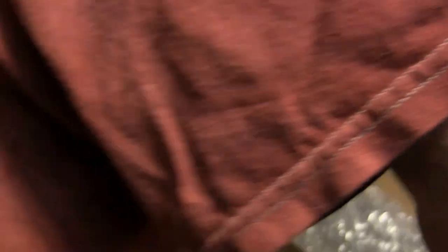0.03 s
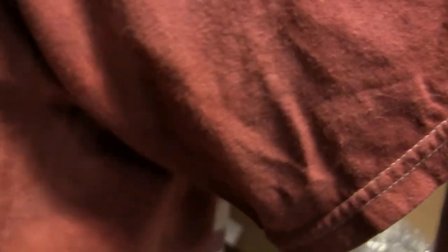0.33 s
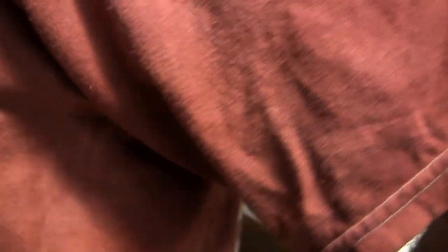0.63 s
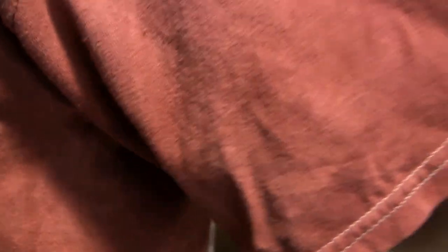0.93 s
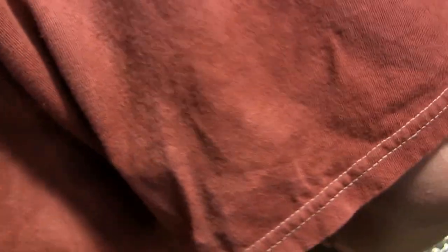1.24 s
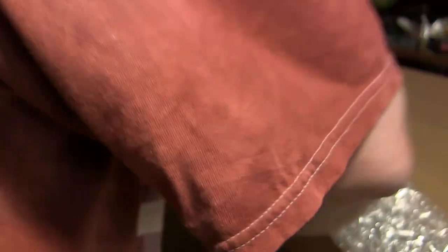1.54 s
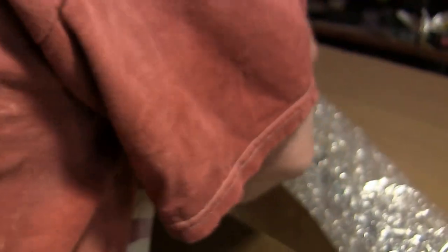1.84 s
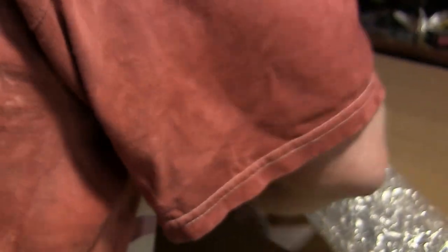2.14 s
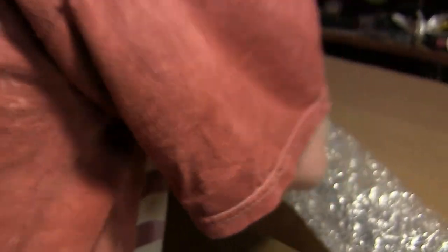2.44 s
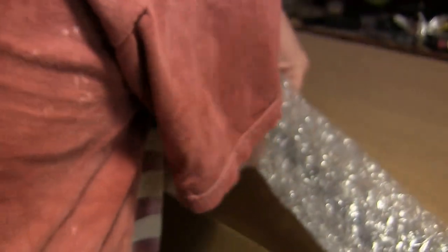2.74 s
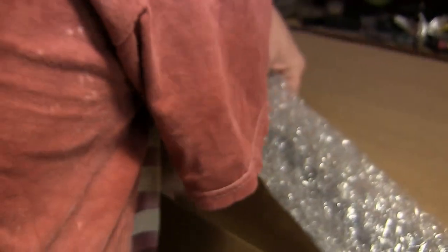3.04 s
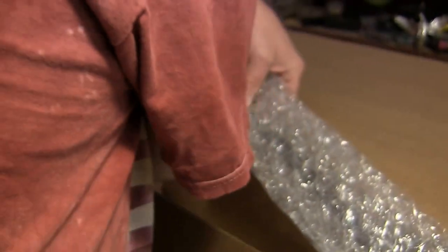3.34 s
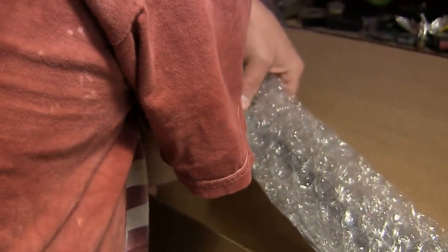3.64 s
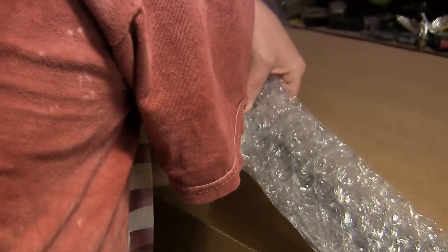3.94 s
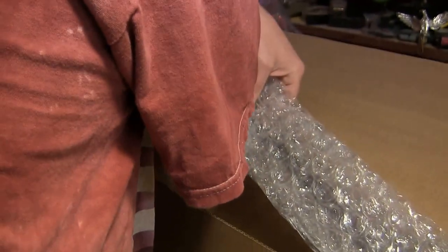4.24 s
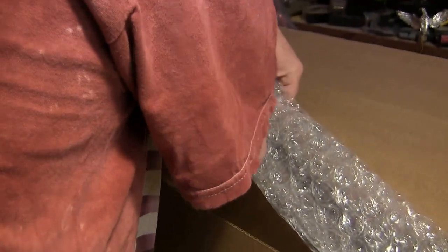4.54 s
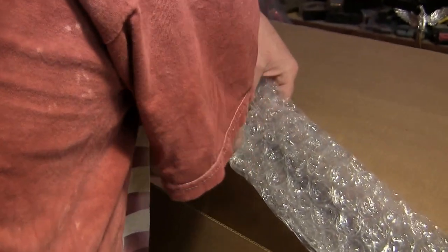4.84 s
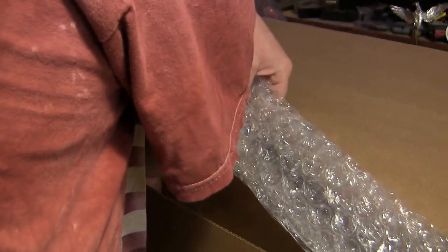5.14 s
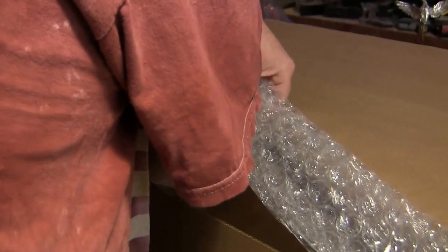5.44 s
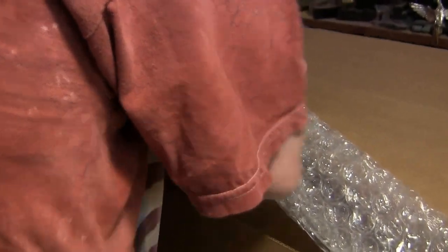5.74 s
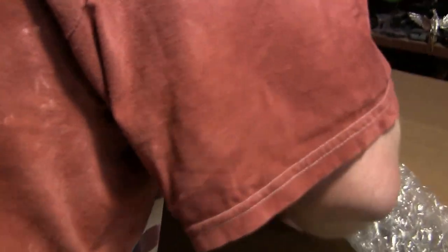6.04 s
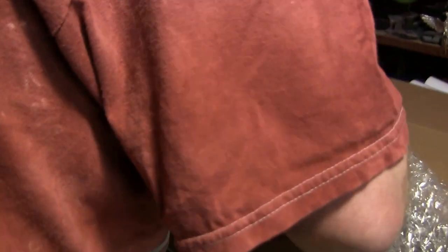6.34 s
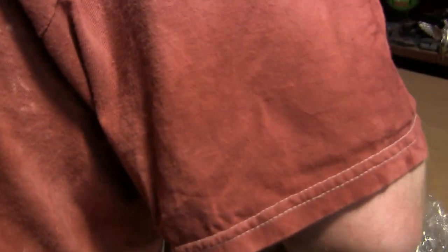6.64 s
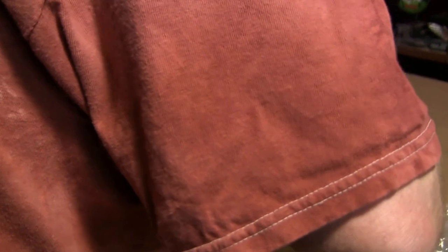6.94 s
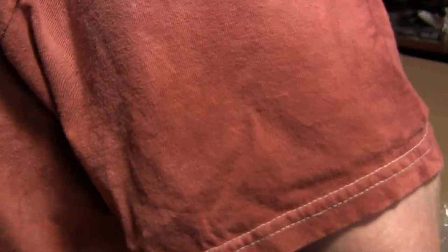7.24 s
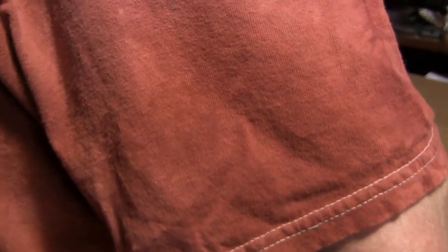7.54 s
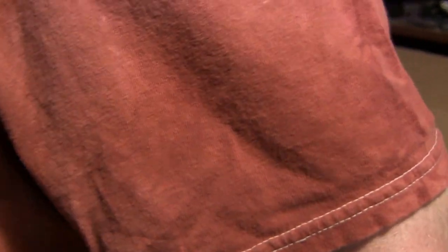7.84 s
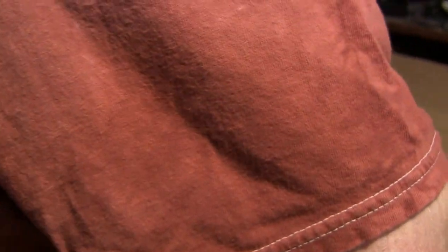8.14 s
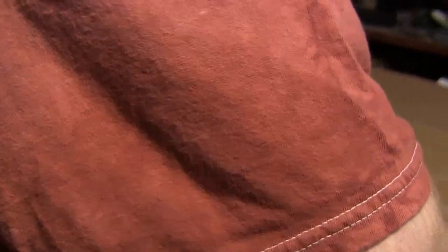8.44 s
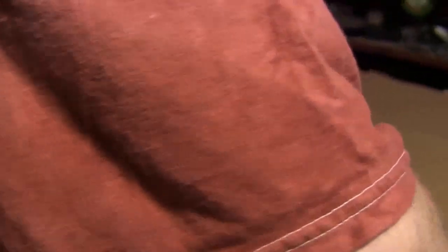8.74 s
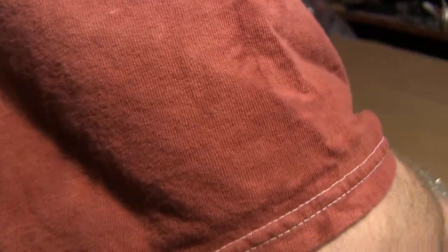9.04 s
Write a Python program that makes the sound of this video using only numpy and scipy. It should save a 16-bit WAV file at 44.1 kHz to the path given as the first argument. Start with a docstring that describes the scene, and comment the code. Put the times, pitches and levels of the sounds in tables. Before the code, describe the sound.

Plastic bubble wrap crackles and scrapes against a cardboard box, which gives several short, hollow knocks. The handling then eases into scattered crinkles, small ticks and brief hoarse squeaks. Past the middle the rustling picks up again, the box is bumped, and the wrap ends in a dense, fizzing crackle with sharp snaps. Everything is heard up close in a small, quiet room.

```python
"""In a small, quiet room a roll of bubble wrap is worked out of a cardboard box, close to the microphone.
The film crinkles in countless tiny buckles and snaps sharply where single folds flip over. Friction
makes it fizz, and makes it rasp, rush and squeak as it drags along the cardboard. Hands and roll knock
against the box, and all of this handling drives the panels and the enclosed air, which ring briefly."""
import sys
import numpy as np
from scipy import signal
from scipy.fft import rfft, irfft, next_fast_len
from scipy.io import wavfile
from scipy.ndimage import uniform_filter1d, map_coordinates

SR = 44100
rng = np.random.default_rng(int(sys.argv[2]) if len(sys.argv) > 2 else 0)


def store_wav(level_fs):
    """Save 16-bit WAV to argv[1]."""
    pcm = np.round(np.clip(np.atleast_2d(level_fs), -1, 1) * 32767)
    wavfile.write(sys.argv[1], SR, pcm.T.astype(np.int16))


N = 401310

# film fizz and bubble crinkle as heard through the microphone, with its dip at 3.7 kHz: f/Hz, level/dB
HEARD_FIZZ = [(1500, -63), (3000, -0.5), (3700, -10.5), (4700, 2), (6800, -1.5), (9000, -9.5),
              (11500, -10.5), (14000, -17), (16000, -25)]
HEARD_CRINKLE = [(30, -62), (120, -31), (300, -22.5), (550, -3.5), (1200, 2), (1700, -0.5), (2300, 0.5),
                 (3000, -5.5), (3700, -12.5), (6000, -23), (12000, -40)]
# stirring of the wrap, which never quite rests between strokes: t/s, level/dB
STIRRING = [(0, -35.5), (0.85, -32.5), (1.15, -39), (1.5, -47.5), (1.73, -53), (2.05, -49), (2.45, -50),
            (2.7, -46.5), (3.6, -52), (3.87, -43), (4.5, -50.5), (5.8, -49), (6.0, -38), (6.7, -40),
            (7.0, -40), (7.85, -37), (8.15, -29.5), (8.45, -32.5), (9.09, -35.5)]


def amp(db):
    """Amplitude ratio of a level in decibels."""
    return 10 ** (np.asarray(db) / 20)


def unit(x):
    """Normalisation to rms 1."""
    return x / np.sqrt(np.mean(x ** 2) + 1e-20)


def along(points, hz):
    """Interpolation of (f/Hz, value) points on a logarithmic frequency axis."""
    f, values = np.transpose(points)
    return np.interp(np.log(hz + 1), np.log(f), values)


def level_curve(points):
    """Gain per sample by linear interpolation of (t/s, level/dB) points."""
    return amp(np.interp(np.arange(N) / SR, *np.transpose(points)))


def add(track, s, sound):
    """Superposition of a sound on the track, starting at s seconds."""
    part = track[max(round(s * SR), 0):][:len(sound)]
    part += sound[:len(part)]


def wobble(rate):
    """Smooth random modulation: a spline through rate knots a second."""
    knots = rng.standard_normal(int(N * rate / SR) + 4)
    return map_coordinates(knots, [np.arange(N) * rate / SR])


def filtered(x, response):
    """Linear filtering: the spectrum of x times a complex frequency response."""
    size = next_fast_len(N + SR // 2)
    return irfft(rfft(x, size) * response(np.fft.rfftfreq(size, 1 / SR)), size)[..., :N]


def coloured(x, spectrum, size=4096):
    """Minimum-phase filtering: the response is causal, so clicks keep their sharp fronts."""
    cepstrum = irfft(np.log(amp(along(spectrum, np.fft.rfftfreq(size, 1 / SR)))))
    cepstrum[1:size // 2] *= 2
    cepstrum[size // 2 + 1:] = 0
    return signal.fftconvolve(x, irfft(np.exp(rfft(cepstrum))))[:N]


def noise(spectrum):
    """Stationary Gaussian noise of rms 1 with the given spectral shape."""
    return unit(coloured(rng.standard_normal(N), spectrum))


def resonate(x, modes, bend):
    """Forced response of damped modes (f/Hz, bandwidth/Hz, level/dB); bend scales their frequencies."""
    warped_time, out = np.cumsum(bend) / SR, 0
    for hz, width, db in modes:
        carrier = np.exp(2j * np.pi * hz * warped_time)
        pole = np.exp(-np.pi * width / SR)
        envelope = signal.lfilter([1 - pole], [1, -pole], x * carrier.conj())
        out = out + 2 * amp(db) * (envelope * carrier).real
    return out


def swing(t, hz, cycles):
    """Heavily damped oscillation of peak 1 whose envelope is greatest after the given cycles."""
    turns = t * hz
    wave = np.sin(2 * np.pi * turns) * turns * np.exp(-turns / cycles)
    return wave / np.abs(wave).max()


def bursts(rate, spread_db, life_s, bed):
    """Shot-noise envelope of rms 1: random jumps of energy decay exponentially over a steady bed."""
    sizes = amp(spread_db * np.minimum(rng.standard_normal(N), 2.1))
    jumps = (rng.random(N) < rate / SR) * sizes ** 2 / rate
    energy = signal.lfilter([1], [1, -np.exp(-1 / (life_s * SR))], jumps)
    return unit(np.sqrt(energy / energy.mean() + bed))


def grains(rate, spread_db, life_s, bed):
    """Amplitude-modulated white noise: tiny bursts over smooth friction."""
    return bursts(rate, spread_db, life_s, bed) * rng.standard_normal(N)


def strokes(rows, swell_db=12, release_db_per_s=293):
    """Incoherent addition: strokes swell up to time t, hold and fade; one gain per level column."""
    t, power = np.arange(N) / SR, 0
    for s, attack, hold, *levels_db in rows:
        rise_db = swell_db * np.minimum(t - s, 0) / attack
        fall_db = release_db_per_s * np.maximum(t - s - hold, 0)
        shape = amp(np.maximum(rise_db - fall_db, -100))
        power = power + np.outer(amp(levels_db), shape) ** 2
    return np.sqrt(power)


def room_hush():
    """Ambient noise: the steady floor of the quiet room, strongest in the bass."""
    spectrum = [(25, -13), (160, -5), (16000, -32)]  # room noise: f/Hz, level/dB
    return amp(-59) * noise(spectrum)


def grip_rumble():
    """Structure-borne noise: a faint rumble as the microphone shifts in the hand."""
    shifts = [(5.08, 0.15, 0.87, -61.5)]  # movement of the grip: t/s, attack/s, hold/s, level/dB
    spectrum = [(25, -17), (75, 7), (600, -69)]  # handling noise: f/Hz, level/dB
    return strokes(shifts)[0] * noise(spectrum)


def room_tail():
    """Reverberation: a random impulse response of energy 1, whose treble is absorbed first."""
    decay_times = [(150, 0.32), (700, 0.31), (3000, 0.18), (14000, 0.031)]  # reverberation time: f/Hz, T60/s
    hz, t, spectra = signal.stft(rng.standard_normal(SR // 3), SR, nperseg=256)
    decay = amp(-60 * t / along(decay_times, hz)[:, None])
    tail = signal.istft(spectra * decay, SR, nperseg=256)[1]
    tail *= 1 - np.exp(-np.arange(len(tail)) / SR / 0.002)
    return tail / np.linalg.norm(tail)


def with_reflections(hit, wall_db, scatter_db, scatter_life_s, room_db):
    """Multipath propagation: direct sound, far box wall echo, nearby scatter and room tail."""
    tail = room_tail()
    t = np.arange(len(tail)) / SR
    scatter = rng.standard_normal(len(t)) * np.exp(-t / scatter_life_s) * (1 - np.exp(-t / 0.0012))
    path = amp(scatter_db) * scatter / np.linalg.norm(scatter) + amp(room_db) * tail
    add(path, 0, [1])
    add(path, 0.0057, [amp(wall_db)])
    return signal.fftconvolve(hit, path)


def box_ring(drive):
    """Modal resonance of the box, a little sharp or flat as the hands load its panels."""
    modes = [(168, 24, -3.5), (368, 48, 0), (520, 56, -0.5), (620, 30, -5), (785, 40, 0.5), (1141, 45, 3.5),
             (1590, 70, -3.5)]  # panels and enclosed air: f/Hz, bandwidth/Hz, level/dB
    return resonate(drive, modes, bend=1 + 0.042 * wobble(3.4))


def box_grumble():
    """Flexure: the bending panels radiate a low, grainy noise."""
    spectrum = [(30, -35), (100, -57.5), (150, 2), (250, -2.5), (400, 0), (650, -0.5), (1500, -32.5)]  # flexing cardboard: f/Hz, level/dB
    return unit(coloured(grains(rate=160, spread_db=6, life_s=0.0028, bed=0.56), spectrum))


def wall_rush():
    """Sliding friction: the box wall rushes as the roll passes along it."""
    slides = [(8.06, .1, 0.51, -41.5), (8.285, 0.04, 0.072, -31), (8.62, 0.18, 0.061, -35),
              (8.8, 0.077, 0.11, -41)]  # roll on the wall: t/s, attack/s, hold/s, level/dB
    spectrum = [(120, -38), (220, -11.5), (330, -5), (500, 1.5), (750, -17), (1500, -27)]  # rubbed wall: f/Hz, level/dB
    return strokes(slides)[0] * noise(spectrum)


def slips(rate, jitter, spread_db):
    """Stick-slip motion: an impulse each time the roll lets go, at an uneven rate."""
    count = np.floor(np.cumsum(rate * np.exp(jitter * wobble(40))) / SR)
    return unit(np.diff(count, prepend=0) * amp(spread_db * rng.standard_normal(N)))


def edge_rasp():
    """Stick-slip excitation: the dragging roll drives the resonances of a cardboard edge."""
    drags = [(.49, 0.012, 0.019, -29), (.66, 0.16, 0.093, -27.5)]  # roll over the edge: t/s, attack/s, hold/s, level/dB
    modes = [(600, 145, 4), (1440, 115, 1.9)]  # edge resonances: f/Hz, bandwidth/Hz, level/dB (each per pass)
    pushes = slips(rate=64, jitter=0.25, spread_db=2) + 0.35 * rng.standard_normal(N)
    bend = 1 + 0.015 * wobble(9)  # pitch wavers with the pressure of the roll
    rasp = resonate(resonate(pushes, modes, bend), modes, bend)  # two passes soften each onset
    return strokes(drags)[0] * unit(rasp)


def squeaks(width_hz=180):
    """Friction-driven resonance: film squeaks hoarsely on cardboard, rising in pitch if it tightens."""
    rubs = [(0.79, 0.2, -39, 1510, 430), (1.855, 0.064, -32.5, 1540, 80), (2.638, 0.072, -34.5, 1150, 0),
            (3.419, 0.037, -31, 610, 0), (3.599, .2, -40.5, 556, 0)]  # film on cardboard: t/s, duration/s, level/dB, f/Hz, rise/Hz
    out = 0
    for s, length, db, hz, rise_hz in rubs:
        progress = np.clip((np.arange(N) / SR - s) / length, 0, 1)
        bend = 1 + progress * rise_hz / hz
        mode = [(hz, width_hz, 0)]
        tone = unit(resonate(resonate(rng.standard_normal(N), mode, bend), mode, bend))
        arch = 2 * np.sqrt(progress * (1 - progress))
        out = out + amp(db) * arch * tone
    return out


def crack(t, spectrum):
    """Broadband transient: a coloured noise burst that decays within milliseconds."""
    return coloured(rng.standard_normal(len(t)) * np.exp(-t / 0.0016), spectrum)[:len(t)]


def knocks():
    """Impact excitation: each blow dents the cardboard; hard contacts are higher and crack more."""
    blows = [(0.1236, -23, 292, 0.41), (0.9276, -3, 530, 0.31), (0.9976, -3, 870, 0.59),
             (1.077, -7.5, 860, 0.65), (1.122, -16.5, 920, 0.41), (1.248, -22, 820, 0.57),
             (1.8467, -19, 212, 0.53), (1.855, -25, 360, 0.41), (2.1185, -26, 420, 0.86),
             (2.297, -23, 210, 0.35), (2.437, -30.5, 280, 0.3), (2.561, -25, 517, 0.39),
             (2.575, -21.5, 390, 0.24), (2.9333, -19.5, 1120, 0.68), (3.2486, -14.5, 1480, 0.66),
             (3.4746, -21, 660, 0.98), (3.9609, -25.5, 1140, 0.4), (4.0927, -19, 670, 0.5),
             (4.6267, -18, 1050, 0.53), (4.691, -21, 1170, 0.25), (4.781, -22.5, 1570, 0.94),
             (5.325, -17.5, 846, 0.4), (5.472, -24.5, 1220, 0.78), (5.8363, -20.5, 279, 0.86),
             (6.2991, -10, 296, 0.4), (6.3047, -14.5, 186, 0.46), (6.382, -20, 1390, 0.51),
             (6.5095, -18, 1220, 0.77), (6.511, -16.5, 516, 0.31), (6.5528, -5, 575, 0.28),
             (6.5567, -1.5, 1130, 0.48), (6.5582, -11, 467, 0.45), (6.566, -9, 1050, 0.55),
             (6.9544, -10, 1430, 0.42), (7.632, -22.5, 333, 0.34), (7.7624, -11.5, 1000, 0.54),
             (8.8709, -16.5, 436, 0.36)]  # hands and roll on the box: t/s, level/dB, f/Hz, ring/cycles
    track, t = np.zeros(N), np.arange(SR // 12) / SR
    for s, db, hz, cycles in blows:
        dent = swing(t, hz, cycles) - amp(-9) * swing(t, hz * 2.12, cycles=0.64)
        hardness = amp(-11) * min(hz / 900, 1) ** 2
        hit = dent + hardness * crack(t, HEARD_CRINKLE)
        heard = with_reflections(hit, wall_db=-12, scatter_db=-13, scatter_life_s=0.008, room_db=-14)
        add(track, s - 0.0003, amp(db) * heard)
    return track


def stray_folds(count=100, above_stirring_db=15.5, spread_db=1.5, centre_hz=3900, spread_octaves=0.8):
    """Random buckling of lesser folds, as loud as the wrap is restless: rows of t/s, level/dB, f/Hz."""
    s = rng.random(count) * N / SR
    size, pitch = np.clip(rng.standard_normal((count, 2)), -2, 2).T
    db = np.interp(s, *np.transpose(STIRRING)) + above_stirring_db + spread_db * size
    return list(zip(s, db, centre_hz * 2 ** (spread_octaves * pitch)))


def snaps():
    """Snap-through: a fold flips and swings; small, high folds have a sharper front and more fizz."""
    folds = [(0.209, -4, 3120), (0.217, -6, 2530), (0.304, -10.5, 8950), (0.3263, -3, 9400),
             (0.3895, -15.5, 7200), (0.535, -16.5, 5000), (0.7466, -8, 4830), (2.5456, -14, 4870),
             (2.8443, -21, 6020), (3.2488, -22, 5000), (3.9744, -23.5, 1800), (4.005, -24.5, 5500),
             (4.0482, -19.5, 1460), (4.275, -25.5, 1500), (4.3364, -22, 2480), (4.558, -19.5, 6350),
             (4.7452, -21, 1480), (5.007, -22, 1680), (5.9194, -9, 1310), (6.4469, -12.5, 1360),
             (6.9636, -8, 3620), (7.2108, -13.5, 1280), (7.3, -19.5, 1550), (7.369, -3, 5230),
             (7.762, -10, 3030), (7.9337, -15.5, 2470), (8.073, -9.5, 1230), (8.2627, -4, 5000),
             (8.2937, -3.5, 2430), (8.3263, -8.5, 2780), (8.3606, -4, 2000), (8.366, -7, 2060),
             (8.4669, -6.5, 2260), (8.8699, -5.5, 2340)]  # single folds flipping over: t/s, level/dB, f/Hz
    track, t = np.zeros(N), np.arange(SR // 50) / SR
    front = swing(t, hz=6650, cycles=0.46)
    for s, db, hz in folds + stray_folds():
        sharpness = amp(-6) * min(hz / 3000, 1)
        hit = swing(t, hz, cycles=0.33) + sharpness * (front + crack(t, HEARD_FIZZ))
        heard = with_reflections(hit, wall_db=-19, scatter_db=-12.5, scatter_life_s=0.012, room_db=-12.5)
        add(track, s - 0.0001, amp(db) * heard)
    return track


def scuffs(hiss):
    """Brief friction of taut film on itself: the hiss flares in Gaussian pulses."""
    contacts = [(1.912, 0.0095, -40), (2.232, 0.032, -40), (2.843, .006, -43), (2.98, 0.017, -53),
                (3.186, 0.0048, -44), (3.79, 0.0067, -38), (4.139, 0.0048, -39), (4.351, .007, -48),
                (4.561, 0.012, -41), (5.661, 0.019, -38.5)]  # film on film: t/s, half-length/s, level/dB
    t = np.arange(N) / SR
    gain = sum(amp(db) * np.exp(-np.minimum(((t - s) / half) ** 2, 20)) for s, half, db in contacts)
    return gain * unit(hiss)


def dappled(x, patchy_db):
    """Local resonance: each crackle comes from another patch of film and has its own colour."""
    spectra = signal.stft(x, nperseg=512)[2]
    field = uniform_filter1d(rng.standard_normal(spectra.shape), size=3, axis=0)  # across frequency
    field = uniform_filter1d(field, size=4, axis=1)  # across time
    return signal.istft(spectra * amp(patchy_db * unit(field)), nperseg=512)[1][:N]


def film(fizz_gain, crinkle_gain, usual_crinkle_db=-41, glide_db=-29):
    """Friction and buckling: film fizzes, bubbles crinkle; brisker handling makes the crackle denser."""
    sheen = [(0, 4.5), (.75, 11), (2.2, 7), (2.7, 7.5), (4.4, 7), (5.25, 10), (6.0, 6.5), (7.2, 2.5),
             (8.3, 3.5), (9.1, 2)]  # lift of the fizz above 9 kHz: t/s, level/dB
    pace = (crinkle_gain / amp(usual_crinkle_db)) ** 0.4
    catch = bursts(rate=72, spread_db=1, life_s=0.01, bed=1.6)  # one buckle sets off its neighbours
    catch = catch ** (1 / np.hypot(1, fizz_gain / amp(glide_db)))  # gliding film catches less
    friction = coloured(grains(rate=900 * pace, spread_db=15, life_s=0.00099, bed=1), HEARD_FIZZ)
    treble = filtered(friction, lambda hz: 1 - 1 / (1 + (hz / 9000) ** 6))
    fizz = unit(friction + (level_curve(sheen) - 1) * treble)
    buckles = coloured(grains(rate=600 * pace, spread_db=0, life_s=0.0016, bed=0.22), HEARD_CRINKLE)
    crinkle = unit(dappled(buckles, patchy_db=2.5))
    return catch * (fizz_gain * fizz + crinkle_gain * crinkle) + scuffs(friction + amp(24.5) * treble)


def handling():
    """Power sum of strokes and stirring: the gains of fizz, crinkle and box flexing."""
    # pulls and squeezes of the roll: t/s, attack/s, hold/s, fizz/dB, crinkle/dB, flexing/dB
    pulls = [(0.02, 0.13, 0.23, -30.5, -33.5, -37), (0.45, 0.0042, 0.017, -38, -31, -35.5),
             (0.73, 0.06, 0.061, -31.5, -30.5, -42), (1.33, 0.029, 0.17, -50, -49, -51.5),
             (1.61, 0.006, 0.0055, -45, -41.5, -71), (1.875, 0.031, 0.04, -35.5, -30.5, -32),
             (2.07, 0.18, 0.23, -38, -38.5, -47), (2.57, 0.059, 0.075, -44, -41.5, -38.5),
             (2.65, 0.022, 0.049, -43.5, -36, -39), (2.732, 0.02, 0.0042, -34.5, -30.5, -34.5),
             (2.85, 0.064, 0.02, -49, -38.5, -41.5), (2.94, 0.019, 0.028, -45.5, -35.5, -35),
             (3.14, 0.12, 0.22, -53.5, -47, -48), (3.425, 0.047, 0.006, -44, -36.5, -35.5),
             (3.545, 0.018, 0.0093, -45, -35.5, -36.5), (3.66, 0.02, 0.059, -34.5, -34.5, -39.5),
             (3.77, 0.024, 0.025, -38.5, -38, -42), (4.07, 0.049, 0.036, -44.5, -42.5, -65),
             (4.139, 0.017, 0.0025, -42, -30, -34.5), (4.28, 0.046, .13, -50.5, -46, -48.5),
             (4.665, 0.11, 0.006, -52, -44.5, -45), (4.735, 0.018, 0.0034, -35, -34.5, -60),
             (4.88, 0.12, 0.094, -48, -40.5, -38.5), (5.085, 0.031, 0.14, -49.5, -39, -39),
             (5.23, 0.035, 0.035, -32.5, -35.5, -42), (5.29, 0.04, 0.019, -61, -29.5, -41.5),
             (5.47, 0.067, 0.024, -54, -44.5, -43), (5.66, 0.024, 0.074, -47, -42.5, -47),
             (5.87, 0.021, 0.27, -36, -32.5, -50), (6.10, 0.039, 0.0051, -41, -31, -60),
             (6.46, 0.027, 0.1, -36.5, -36.5, -40), (6.83, 0.094, 0.1, -33.5, -36, -46),
             (6.97, 0.1, 0.062, -36, -30.5, -40.5), (7.17, 0.2, 0.05, -36, -31, -63),
             (7.36, 0.14, 0.051, -38, -34.5, -72), (7.63, 0.071, 0.0077, -45, -35, -38),
             (7.77, 0.046, 0.013, -44, -29.5, -37), (7.94, 0.028, 0.18, -46.5, -32, -41.5),
             (8.19, 0.11, 0.084, -24.5, -31, -58), (8.268, 0.014, 0.034, -29, -25.5, -36),
             (8.61, 0.12, 0.063, -26.5, -28.5, -38), (8.79, 0.1, 0.037, -26, -27, -39.5),
             (8.875, 0.016, 0.034, -24, -26, -39)]
    shares_db = [-6, -2, -10]  # fizz, crinkle, flexing
    stirring = np.outer(amp(shares_db), level_curve(STIRRING))
    return np.hypot(stirring, strokes(pulls))


def stereo(mid):
    """Phase difference: the sounding spot jumps about the sheet, so either capsule leads in turn."""
    width = [(40, -11), (160, -12.5), (1000, -23.5), (3000, -15), (12000, -9.5)]  # side relative to mid: f/Hz, level/dB
    balance = [(1200, -0.27), (12000, -2)]  # left minus right: f/Hz, level/dB
    side = filtered(mid * unit(wobble(170)), lambda hz: 1j * amp(along(width, hz)))
    channels = np.array([mid + side, mid - side])
    return filtered(channels, lambda hz: amp(np.outer([0.5, -0.5], along(balance, hz))))


def scene():
    """Superposition: rustle and hits sound in the room and force the box into resonance."""
    fizz_gain, crinkle_gain, flex_gain = handling()
    rustle = film(fizz_gain, crinkle_gain)
    rustle += flex_gain * box_grumble() + wall_rush() + edge_rasp() + squeaks()
    bass_cut = signal.butter(4, 130, "highpass", fs=SR, output="sos")  # light panels radiate no deep bass
    hits = signal.sosfilt(bass_cut, snaps() + knocks())
    reverberation = amp(-14) * signal.fftconvolve(rustle, room_tail())[:N]
    ring = box_ring(amp(-9.5) * rustle + amp(-1.5) * hits)
    return stereo(rustle + hits + reverberation + ring + room_hush() + grip_rumble())


def record(dry):
    """Soft saturation rounds peaks near full scale; a steep low-pass limits the band to 16 kHz."""
    rounded = dry / (1 + np.abs(dry) ** 12) ** (1 / 12)
    return filtered(rounded, lambda hz: 1 / (1 + (hz / 16000) ** 160))


dry = scene()
out = record(dry)
store_wav(out)
```